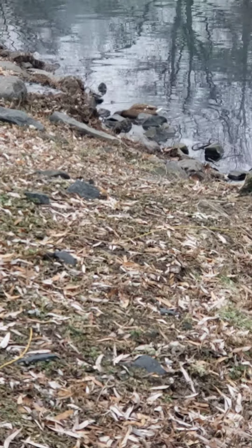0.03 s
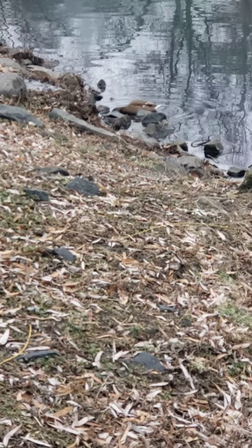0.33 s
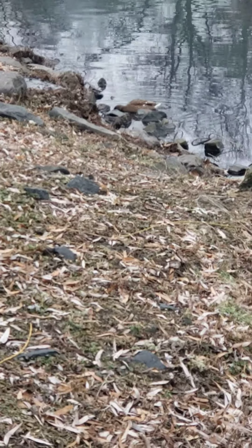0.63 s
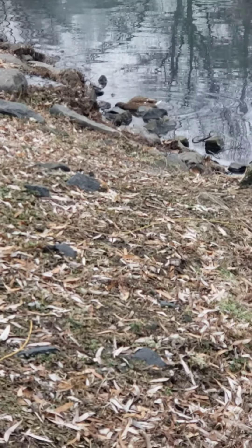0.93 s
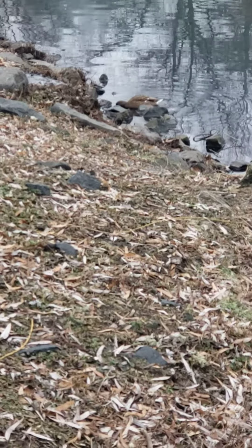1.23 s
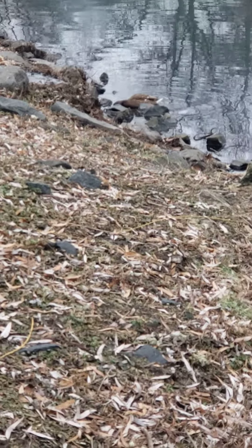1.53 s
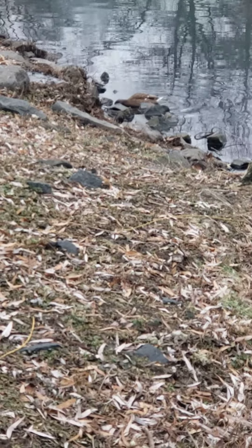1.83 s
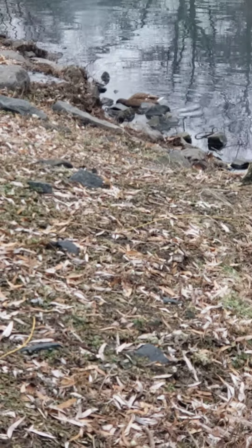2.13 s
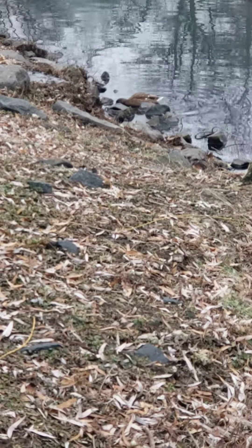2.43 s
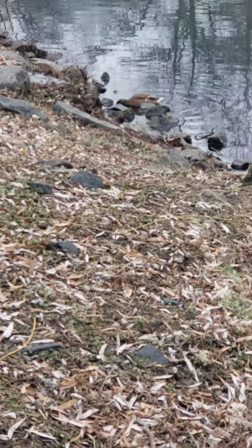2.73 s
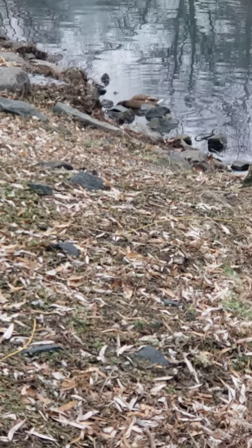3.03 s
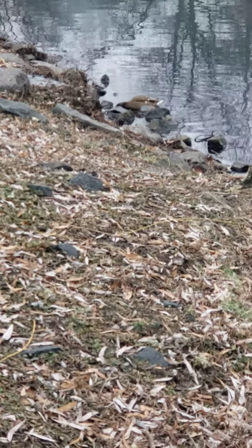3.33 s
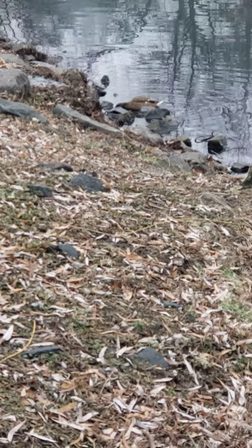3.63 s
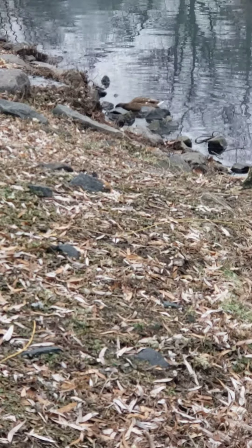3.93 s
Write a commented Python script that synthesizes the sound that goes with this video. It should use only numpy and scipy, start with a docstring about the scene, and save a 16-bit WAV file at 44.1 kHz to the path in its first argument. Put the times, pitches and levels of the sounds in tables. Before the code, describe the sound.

A goose honks once across a pond over a low, distant traffic rumble.

```python
"""A goose calls far off over a steady rumble like distant traffic. Then the main event, one honk from the
pond bank: a low rising grunt breaks into a clear arched note that echoes across the water, and a faint
reply follows. Each goose voice is a stack of harmonics on a slightly unsteady pitch, thrown back by the
banks and washed out by the woods. Small birds in the trees add thin whistles and two chips, all swept
sine tones. The bed underneath is shaped noise."""
import sys
import numpy as np
from scipy import signal
from scipy.fft import rfft, irfft, next_fast_len
from scipy.io import wavfile
from scipy.ndimage import uniform_filter1d, map_coordinates

SR = 44100
rng = np.random.default_rng(int(sys.argv[2]) if len(sys.argv) > 2 else 0)


def log_audio(samples):
    """Write samples as a 16-bit WAV file to the path given in sys.argv[1]."""
    # one column per channel
    frames = np.atleast_2d(samples).T
    # limit to full scale, then quantise
    limited = np.clip(frames, -1, 1)
    pcm = np.round(limited * 32767).astype(np.int16)
    wavfile.write(sys.argv[1], SR, pcm)


N = 176400
T = np.arange(N) / SR

# the near goose's clear, arched note: time_s, pitch_hz, level_db
HONK_CONTOUR = [(2.135, 521.4, -65.5), (2.155, 518, -40.5), (2.172, 540.2, -31.5), (2.195, 543.8, -31),
                (2.235, 553.4, -31.5), (2.258, 537, -34), (2.276, 504.8, -41.5), (2.29, 473, -65)]
# its timbre: harmonic, gain_db
HONK_HARMONICS = [(1, -5), (2, 0.5), (3, -22.5), (4, -37), (5, -32.5), (6, -37.5), (7, -35), (8, -48),
                  (9, -63), (10, -47.5), (11, -55.5)]
# the lead-in grunt, at about a third of the pitch: time_s, pitch_hz, level_db
GRUNT_CONTOUR = [(1.955, 158, -69), (1.99, 160.9, -54), (2.06, 165.6, -52.5), (2.1, 169.1, -48),
                 (2.13, 176.3, -49), (2.165, 180, -50), (2.18, 175, -79.5)]
# its timbre: harmonic, gain_db
GRUNT_HARMONICS = [(3, -5), (4, -4.5), (5, -5.5), (6, -0.5), (7, -6.5), (8, -11), (9, -12.5), (10, -23),
                   (11, -19.5), (12, -19.5)]
# side tones while the voice breaks: pitch_hz, level_db
BREAK_SIDE_TONES = [(664, -42), (1200, -51.5), (1475, -48.5), (1530, -56), (1995, -59.5)]
# the near goose's stereo balance: frequency_hz, left_over_right_db
NEAR_PAN = [(550, -1.6), (1100, -1.5), (4000, 5)]
# its phase between the sides: frequency_hz, left_lead_rad
NEAR_LEAD = [(550, 0.14), (1100, 0.99), (2500, 1.76)]

# the far goose's note: time_s, pitch_hz, level_db
FAR_HONK_CONTOUR = [(.852, 690, -75), (.875, 693, -48), (.9, 725, -47.5), (.915, 722, -51.5),
                    (.935, 697, -57), (.95, 696, -65.5)]
# its timbre: harmonic, gain_db
FAR_HONK_HARMONICS = [(1, -5), (2, -1.5), (3, -21.5), (4, -33.5)]
# the far goose's grunt: time_s, pitch_hz, level_db
FAR_GRUNT_CONTOUR = [(.75, 206.6, -80), (.81, 217, -71.5), (.848, 226, -69.5), (.87, 222, -63),
                     (.895, 217, -64.5), (.91, 221, -81.5)]
# its timbre: harmonic, gain_db
FAR_GRUNT_HARMONICS = [(4, -5), (5, -19.5), (6, -10), (7, 2), (8, -10.5)]
# the faint reply: time_s, pitch_hz, level_db
REPLY_CONTOUR = [(2.96, 378, -69), (2.985, 384.4, -54.5), (3.012, 384, -55), (3.04, 374, -69.5)]
# its timbre: harmonic, gain_db
REPLY_HARMONICS = [(2, -1.5), (3, -2)]

# slaps off the banks: delay_s, gain_db, left_over_right_db
BANK_ECHOES = [(.075, -27.5, -2.5), (.15, -20.5, -5), (.235, -23, -1), (.465, -23, 8)]
# tone of those slaps: frequency_hz, gain_db
BANK_EQ = [(500, -9.5), (1100, -2), (2700, -14), (3900, 6), (4400, 12.5), (6000, -1.5)]
# ring-out of the woods: frequency_hz, t60_s
WOODS_DECAY = [(500, 1.8), (1100, 3.1), (1500, 1.7), (3900, 1), (8000, .6)]
# tone of the woods: frequency_hz, gain_db
WOODS_EQ = [(500, -16), (1100, -12.5), (1500, -9), (2700, -8), (3850, 3), (4400, 4), (6000, 2.5)]

# thin whistles: start_s, length_s, pitch_hz, swoop_hz, rasp_hz, level_db, left_over_right_db, send_db
BIRD_WHISTLES = [(0.782, .085, 7480, 500, 190, -77.5, 3, 7.5), (0.986, .18, 7600, 1400, 55, -61, 1, -1.5),
                 (3.957, .12, 7460, 1614, 101, -63.5, 3, -6)]
# chips: start_s, top_pitch_hz, level_db, left_over_right_db
BIRD_CHIPS = [(2.319, 5810, -62.5, 8), (2.481, 5690, -63, 9)]
# short tail of the twigs around the birds: frequency_hz, t60_s
TWIGS_DECAY = [(5000, 0.29), (8000, .33)]

# tone of the rumble: frequency_hz, relative_db
RUMBLE_EQ = [(20, -38.5), (30, -20), (40, -13.5), (55, -0.5), (78, -0.5), (100, -5), (130, -3), (190, -7),
             (225, -8), (270, -7.5), (300, -15), (350, -18.5), (430, -26), (550, -28.5), (900, -60),
             (2000, -91)]
# tone of the airy wash: frequency_hz, relative_db
AIR_EQ = [(60, -38), (200, -9.5), (450, 0.5), (700, 1), (1000, -2.5), (1300, -8.5), (1900, -8.5),
          (2400, -16.5), (3000, -26.5), (3600, -33), (4500, -35.5), (6300, -36.5), (7800, -46),
          (9300, -46.5), (12000, -37.5), (15500, -38)]
# its width, lower is wider: frequency_hz, left_right_coherence
AIR_COHERENCE = [(400, .85), (900, .7), (1700, .5), (3000, 0.21), (6000, 0.43), (12000, .15)]
# its stereo balance: frequency_hz, left_over_right_db
AIR_BALANCE = [(400, -2), (700, 0), (1100, 6.5), (1800, -2), (2300, 0.5), (3000, 14), (4000, -1.5),
               (6000, 15), (8000, 4), (14000, 2)]
# its phase between the sides: frequency_hz, left_lead_rad
AIR_LEAD = [(200, 0.33), (500, 1.03), (800, 1.42), (1300, 1.2), (2200, 1.94), (3400, 1.05)]


def near_goose():
    """A grunt, a rough break, then the clear note whose treble opens late and closes early."""
    break_s, break_width_s = 2.165, .018
    bright_s, bright_rise_s = 2.198, .02
    opening = .5 + .5 * np.tanh(2 * (T - bright_s) / bright_rise_s)

    def honk_shape(harmonic, fall_db):
        """As the note fades, the fundamental lingers and the fluttering treble dies first."""
        if harmonic == 1:
            return amp(.2 * fall_db)
        if harmonic < 5:
            return 1
        treble = amp(2.8 * wobble(70) - .5 * fall_db)
        return treble * opening if harmonic > 5 else treble

    crack = bell(break_s, break_width_s, T) * sum(
        amp(db) * np.sin(2 * np.pi * hz * T + .6 * wobble(90)) for hz, db in BREAK_SIDE_TONES)
    grunt = voice(GRUNT_CONTOUR, GRUNT_HARMONICS, rough=1.5, shape=lambda *_: amp(2.3 * wobble(25)))
    honk = voice(HONK_CONTOUR, HONK_HARMONICS, rough=.7, shape=honk_shape)
    return grunt + crack + honk


def voice(contour, harmonics, rough, shape=lambda harmonic, fall_db: 1):
    """A goose's voice: harmonics on one pitch; rough scales the pitch jitter and level shimmer."""
    time_s, hz, db = np.transpose(contour)
    pitch = np.interp(T, time_s, hz) * (1 + rough * .0039 * wobble(250))
    phase = 2 * np.pi * np.cumsum(pitch) / SR
    level_db = np.interp(T, time_s, db) + rough * wobble(130)
    fall_db = db.max() - level_db
    gate = uniform_filter1d(1. * ((T > time_s[0]) & (T < time_s[-1])), size=200)
    stack = sum(amp(gain_db) * shape(k, fall_db) * np.sin(k * phase + rng.uniform(0, 2 * np.pi))
                for k, gain_db in harmonics)
    return np.sqrt(2) * gate * amp(level_db) * stack


def far_goose():
    """The same two-part call, higher and shorter, with the faint buzz of another distant bird alongside."""
    hiss_hz, band_hz, hiss_s, width_s = 6000, 980, .92, .05
    band = unit(filtered(rng.standard_normal(N), lambda hz: bell(hiss_hz, band_hz, hz)))
    hiss = amp(-81.5) * bell(hiss_s, width_s, T) * band
    grunt = voice(FAR_GRUNT_CONTOUR, FAR_GRUNT_HARMONICS, rough=7)
    honk = voice(FAR_HONK_CONTOUR, FAR_HONK_HARMONICS, rough=1.4)
    return grunt + honk + hiss


def faint_reply():
    """A short answer from across the pond, just two harmonics."""
    return voice(REPLY_CONTOUR, REPLY_HARMONICS, rough=1.8)


def pond(calls):
    """Separate slaps off the banks, each with a short smear, and a long wash from the woods."""
    def bank_response(hz):
        taps = sum(amp(db) * stereo(pan_db, 0) * delay(hz, s) for s, db, pan_db in BANK_ECHOES)
        return amp(along(BANK_EQ, hz)) * taps

    banks = filtered(calls, bank_response)
    woods = scatter(filtered(calls, lambda hz: amp(along(WOODS_EQ, hz))), WOODS_DECAY)
    smear = scatter(banks, [(1000, .085)])
    return 1.03 * banks + .55 * smear + woods


def far_echo(call, delay_s=.2, gain_db=-9):
    """One extra, blurred repeat of the far goose."""
    repeat = filtered(call, lambda hz: amp(gain_db) * delay(hz, delay_s))
    return scatter(repeat, [(1000, .16)])


def whistles():
    """Each whistle swoops down onto a warbling, rasping pitch, with a weaker tone just above."""
    swoop_s, attack_s, release_s = .017, .049, .0071
    sag_hz_per_s, warble_hz, warble_depth_hz = 600, 52.1, 75
    upper_ratio, upper_db = 1.095, -15
    direct, send = np.zeros((2, N)), np.zeros((2, N))
    for start_s, length_s, hz, swoop_hz, rasp_hz, db, pan_db, send_db in BIRD_WHISTLES:
        t = np.clip(T - start_s, 0, length_s)
        glide = hz + swoop_hz * np.exp(-t / swoop_s) - sag_hz_per_s * (t - length_s / 2)
        warble = warble_depth_hz * np.sin(2 * np.pi * warble_hz * t)
        phase = 2 * np.pi * np.cumsum(glide + warble + rasp_hz * wobble(700)) / SR
        upper = amp(upper_db) * np.sin(upper_ratio * phase + wobble(600))
        envelope = np.clip(t / attack_s, 0, 1) ** 2 * np.clip((length_s - t) / release_s, 0, 1)
        tone = np.sqrt(2) * amp(db + 2 * wobble(120)) * envelope * (np.sin(phase) + upper)
        note = place(tone, pan_db, lead_ms=-.022)
        direct += note
        send += amp(send_db) * note
    return direct + scatter(send, TWIGS_DECAY)


def chips():
    """Short raspy chirps that flick up, then drop to a lower note."""
    length_s, rise_hz, fall_hz, rasp_hz = .036, 450, 550, 110
    direct = np.zeros((2, N))
    for start_s, top_hz, db, pan_db in BIRD_CHIPS:
        progress = np.clip((T - start_s) / length_s, 0, 1)
        glide = top_hz - np.interp(progress, [0, .47, .66], [rise_hz, 0, fall_hz])
        phase = 2 * np.pi * np.cumsum(glide + rasp_hz * wobble(900)) / SR
        direct += amp(db) * stereo(pan_db, 0).real * np.sin(np.pi * progress) * np.sin(phase)
    return direct + scatter(direct, TWIGS_DECAY)


def background(rumble_db=-37.5, air_db=-52.5):
    """The bed: low rumble common to both sides and a wider, softer wash of far traffic and air."""
    def rumble_response(hz):
        pan_db = along([(60, 1.2), (140, 0), (350, -2.5)], hz)
        lead_rad = along([(120, 0), (350, .25)], hz)
        return amp(along(RUMBLE_EQ, hz)) * stereo(pan_db, lead_rad)

    def air_mid_side(hz):
        width_rad = np.arccos(along(AIR_COHERENCE, hz)) / 2
        return amp(along(AIR_EQ, hz)) * [np.cos(width_rad), np.sin(width_rad)]

    rumble = unit(filtered(rng.standard_normal(N), rumble_response))
    mid, side = filtered(rng.standard_normal((2, N)), air_mid_side)
    wide = np.array([mid + side, mid - side])
    air = unit(filtered(wide, lambda hz: stereo(along(AIR_BALANCE, hz), along(AIR_LEAD, hz))))
    return amp(rumble_db + .4 * wobble(4)) * rumble + amp(air_db + .14 * wobble(3)) * air


def amp(db):
    """Decibels to gain."""
    return 10 ** (np.asarray(db) / 20)


def unit(x):
    """Scale to rms 1."""
    return x / np.sqrt(np.mean(x ** 2) + 1e-20)


def bell(centre, width, axis):
    """A Gaussian bump of height 1."""
    return np.exp(-.5 * ((axis - centre) / width) ** 2)


def along(points, hz):
    """Read a curve of (frequency_hz, value) points on a log axis."""
    knots_hz, values = np.transpose(points)
    return np.interp(np.log(hz + 1), np.log(knots_hz + 1), values)


def wobble(rate):
    """A smooth random modulator, rate knots a second."""
    return map_coordinates(rng.standard_normal(int(2 * rate * N / SR) + 10), [T * rate])


def filtered(x, response):
    """Run x through a complex frequency response."""
    size = next_fast_len(N + SR)
    return irfft(rfft(x, size) * response(np.fft.rfftfreq(size, 1 / SR)), size)[..., :N]


def delay(hz, seconds):
    """Frequency response of a pure delay."""
    return np.exp(-2j * np.pi * hz * seconds)


def stereo(pan_db, lead_rad):
    """Left and right gains; positive values make the left louder and earlier."""
    return np.array([amp(s * pan_db) * np.exp(1j * s * lead_rad) for s in (.5, -.5)]).reshape(2, -1)


def place(x, pan_db, lead_ms):
    """Position a mono sound by level and arrival time."""
    return filtered(x, lambda hz: stereo(pan_db, 2 * np.pi * hz * lead_ms / 1000))


def scatter(x, t60):
    """Diffuse stereo reverb from a noise tail of energy 1; t60 lists (frequency_hz, t60_s)."""
    hz, t, noise = signal.stft(rng.standard_normal((2, 2 * SR)), SR, nperseg=256)
    decay = amp(-60 * t / along(t60, hz)[:, None])
    decay /= np.linalg.norm(decay, axis=1, keepdims=True)  # equal energy in every band
    tail = signal.istft(noise * decay, SR, nperseg=256)[1]
    return signal.fftconvolve(np.atleast_2d(x), unit(tail) / np.sqrt(tail.shape[1]), axes=1)[:, :N]


def scene():
    """The mix: geese and their pond echoes in front, small birds and the bed behind."""
    near, far, reply = near_goose(), far_goose(), faint_reply()
    near_direct = filtered(near, lambda hz: stereo(along(NEAR_PAN, hz), along(NEAR_LEAD, hz)))
    far_direct = place(far + reply, pan_db=-1.5, lead_ms=.05)
    echoes = pond(near + amp(.5) * (far + reply)) + far_echo(far)
    return near_direct + far_direct + echoes + whistles() + chips() + background()


def record(dry):
    """A brick-wall high cut on the whole mix."""
    return filtered(dry, lambda hz: hz < 15750)


dry = scene()
out = record(dry)
log_audio(out)
```